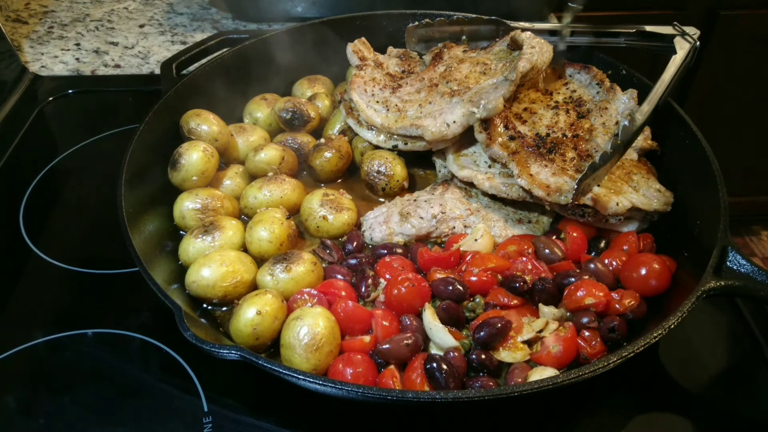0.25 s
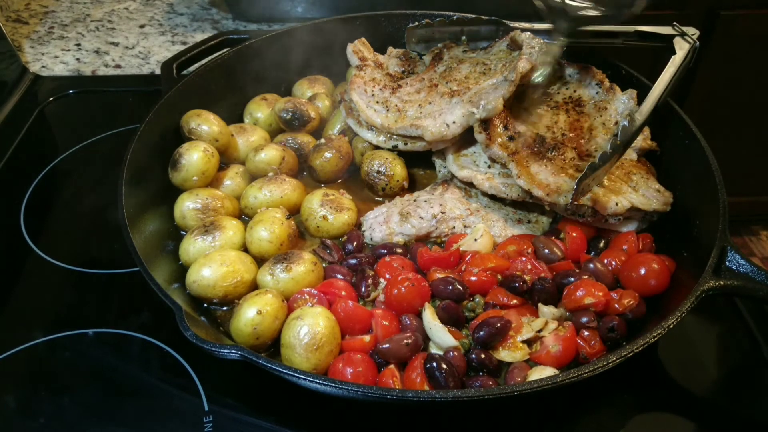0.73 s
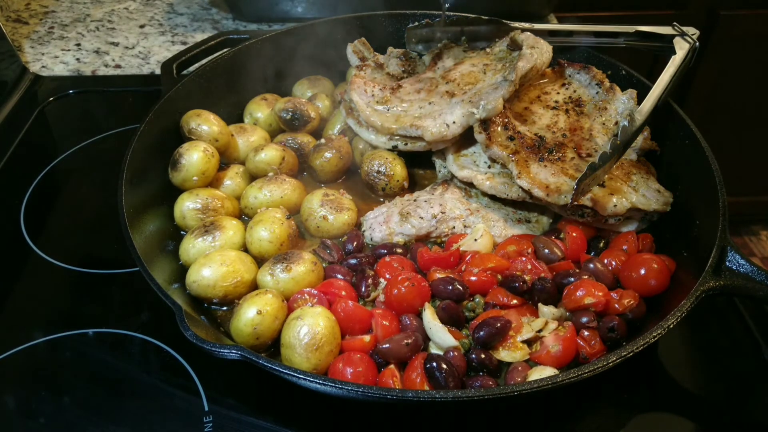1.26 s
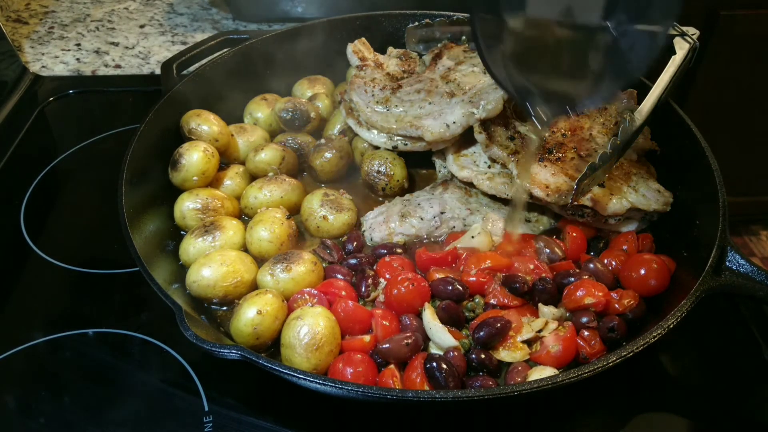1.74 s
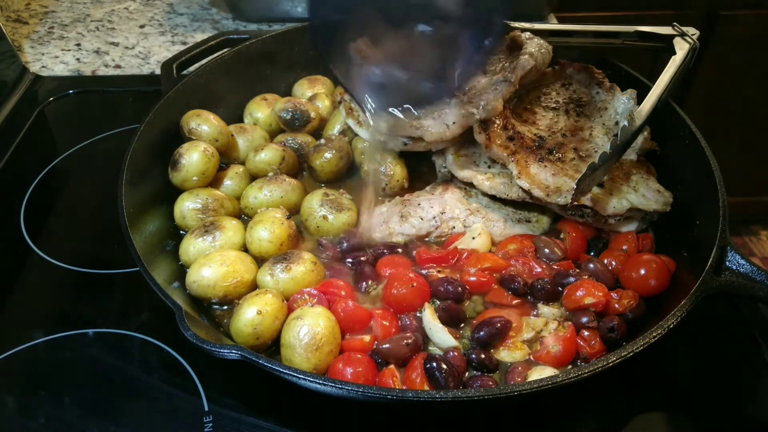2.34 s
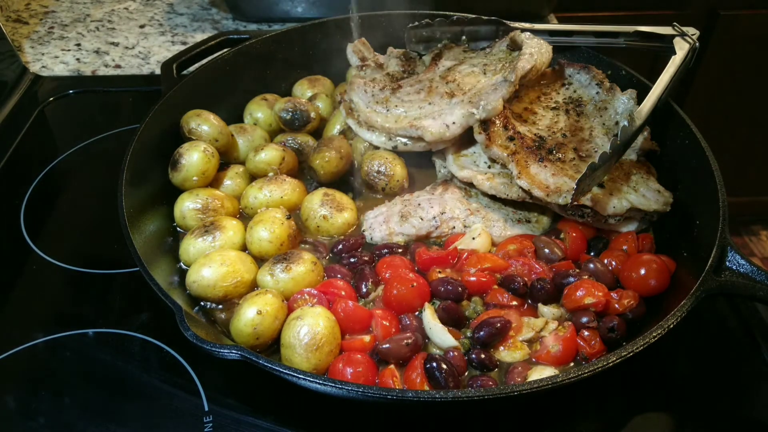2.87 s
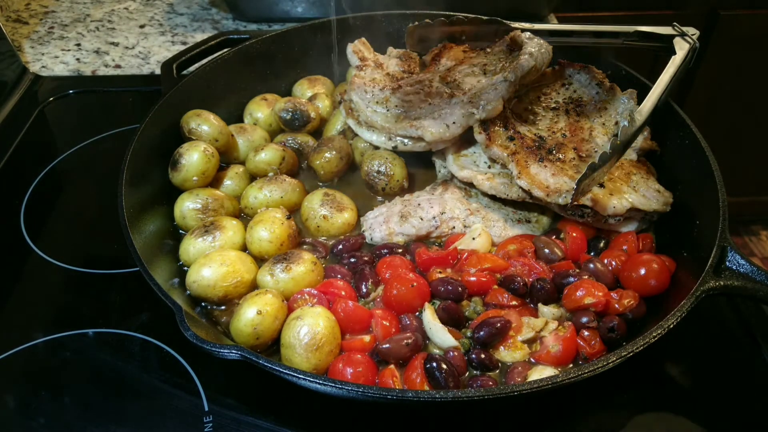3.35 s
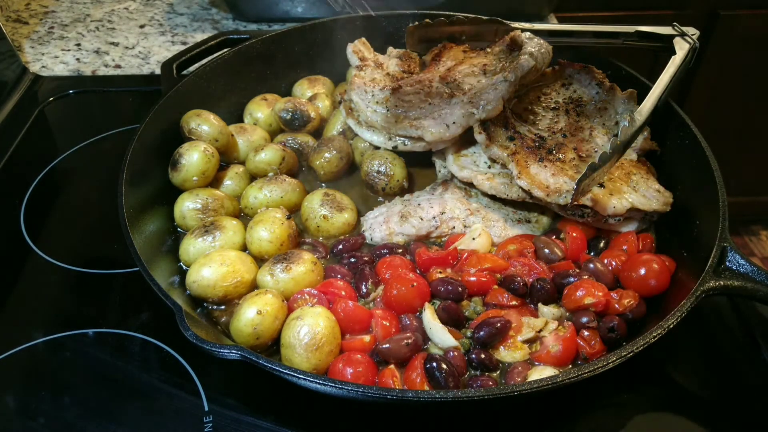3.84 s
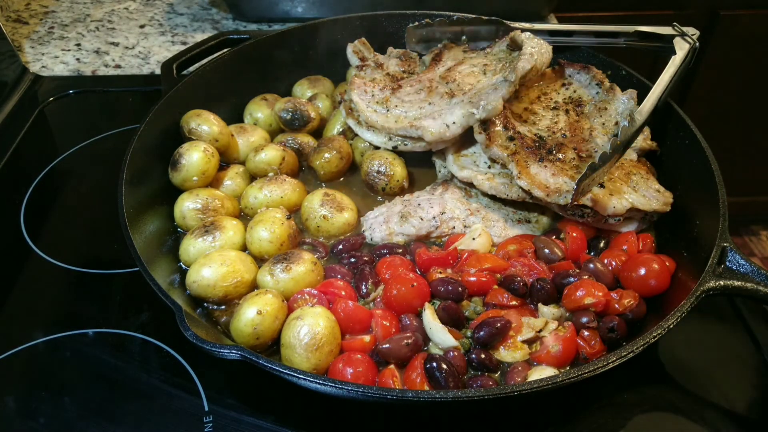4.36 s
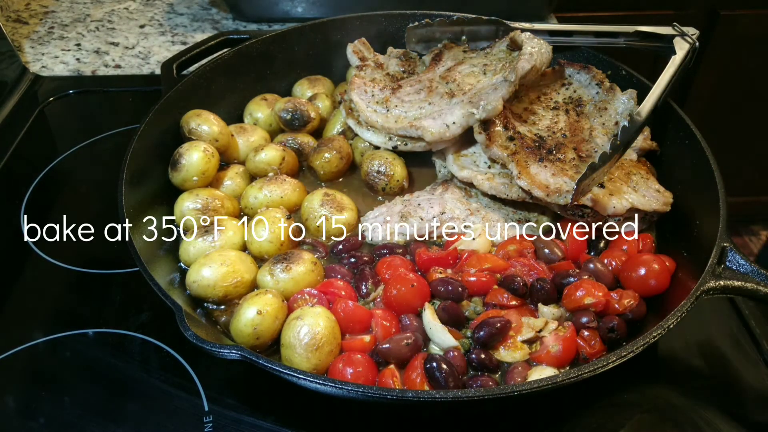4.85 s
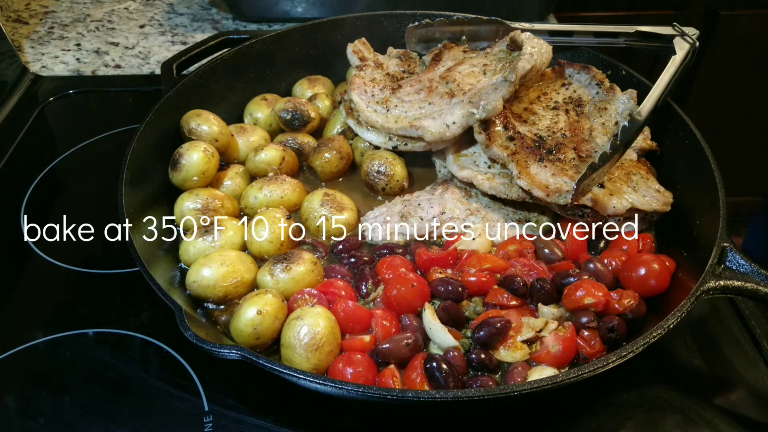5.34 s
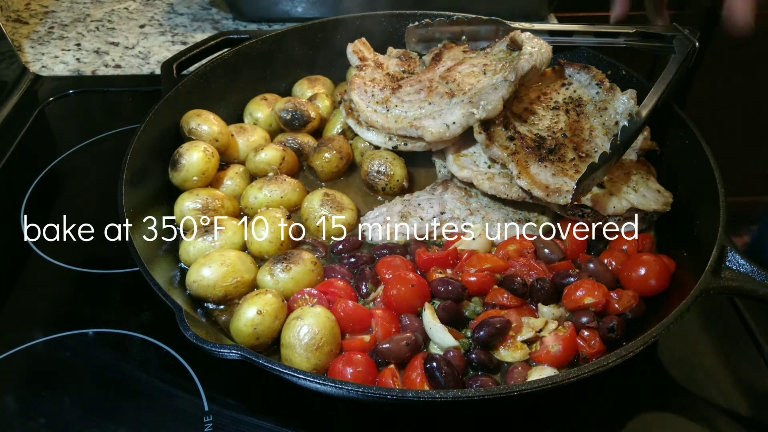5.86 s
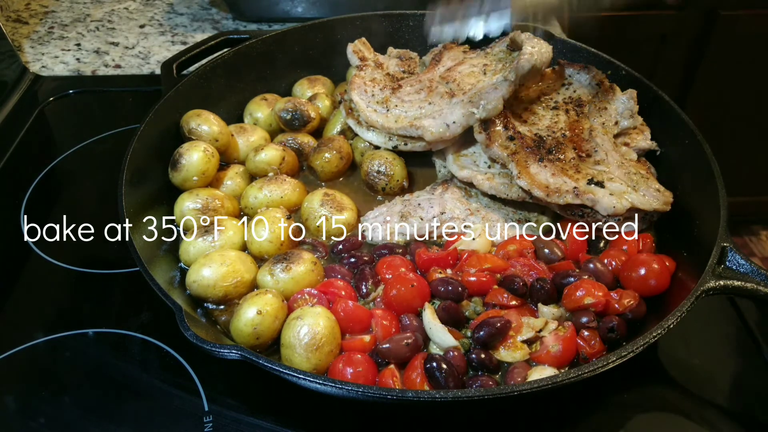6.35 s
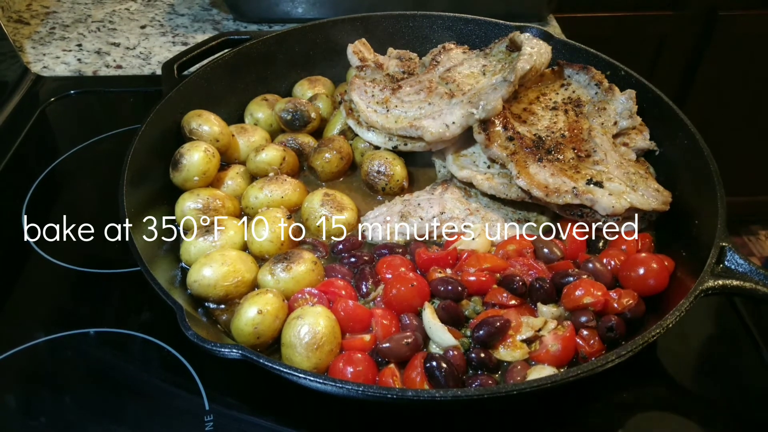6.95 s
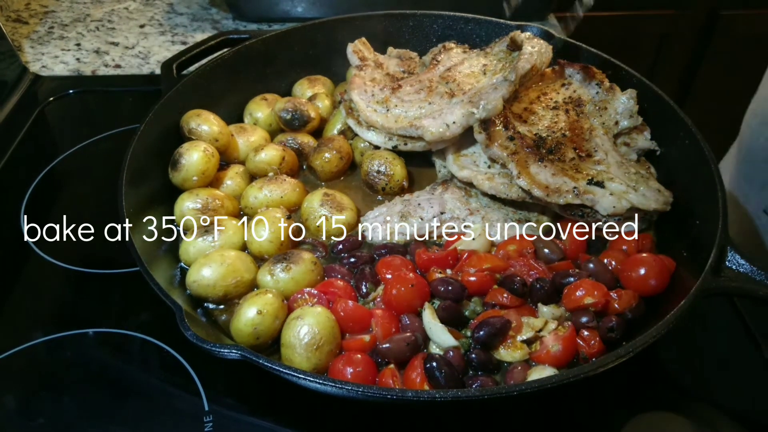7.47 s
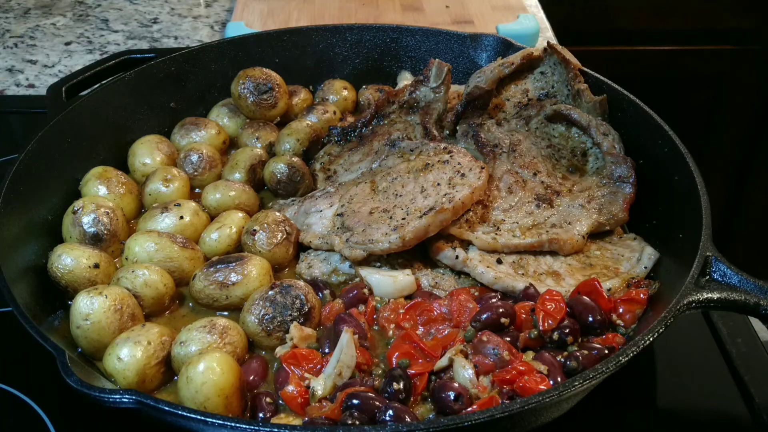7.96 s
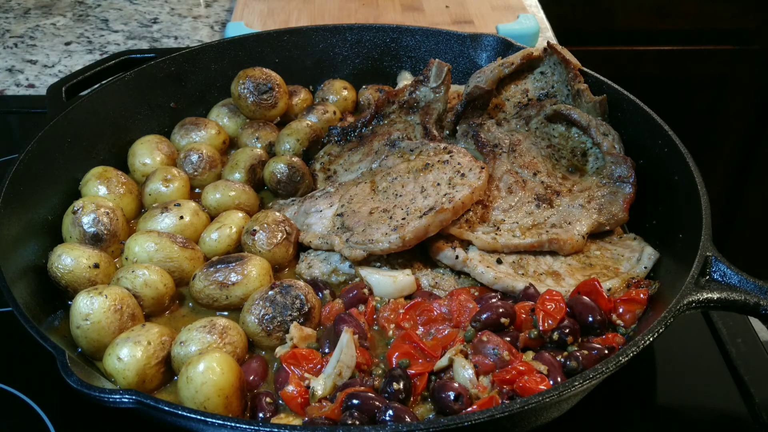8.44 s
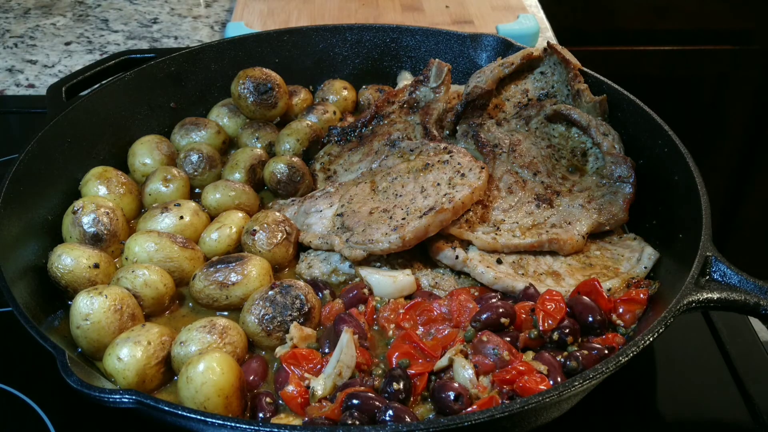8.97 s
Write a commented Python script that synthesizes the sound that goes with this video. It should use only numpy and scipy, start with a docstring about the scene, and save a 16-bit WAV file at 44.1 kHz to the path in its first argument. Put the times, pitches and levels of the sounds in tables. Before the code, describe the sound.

A quiet indoor kitchen heard close to the stove in stereo, with a low wavering motor hum and soft air. From 0 s a skillet simmers and fizzes faintly, with hollow steam leaking until about 1.3 s. Small spits and drips lean to the right. Broth lands briefly near 0.9 and 1.7 s, then in thicker splashes from 2.2 to 3.0 s, with spray, gurgles, plops and one sharp spit at 2.8 s. Afterward the pan settles to a weak simmer with sparse drips. At 5.1 s a metal utensil drops, a very loud hard clank with several bounces and rattle within a tenth of a second, echoing shortly. Light bright tong clicks follow from 5.9 to 7.4 s, with a brief rim scrape near 6.2 s. At 7.7 s everything stops abruptly; from 7.9 s a stiller, bassy room fades in, with a faint rustle around 8.3 to 8.7 s.

```python
"""A motor hums in quiet kitchen air; a skillet simmers and fizzes (noise, bubbles, crackle) and hollow steam leaks.
Spits (band-limited puffs) and drips (rising sines) sound, then broth lands in bursts of spray and gurgle.
From 5.1 s a dropped utensil bounces (decaying modes, noise rattle); tongs click and drag on the rim (resonators).
At 7.7 s the sound stops; a stiller kitchen (shaped noise) fades in, with a faint rustle."""
import sys
import numpy as np
from scipy import signal
from scipy.fft import rfft, irfft
from scipy.io import wavfile

SR = 44100
rng = np.random.default_rng(int(sys.argv[2]) if len(sys.argv) > 2 else 0)


def to_wav(s):
    """Save 16-bit WAV."""
    ch = np.atleast_2d(s).T  # columns
    pcm = np.round(np.clip(ch, -1, 1) * 32767)  # PCM
    wavfile.write(sys.argv[1], SR, pcm.astype(np.int16))


N = 406161
T = np.arange(N) / SR


def amp(db):
    """dB to amplitude factor."""
    return 10 ** (np.asarray(db) / 20)


def rms_one(x):
    """Scale to rms 1."""
    return x / np.sqrt(np.mean(x ** 2) + 1e-20)


def in_time(rows):
    """Interpolate each column of a table over time."""
    s, *columns = np.transpose(rows)
    return [np.interp(T, s, c) for c in columns]


def at_hz(points, hz):
    """Interpolate a table over log frequency."""
    points = np.array(points)
    return np.interp(np.log(hz), np.log(points[:, 0]), points[:, 1])


def panned(x, lr_db, lag=0):
    """Left-right level split; left delayed by lag samples."""
    return np.array([np.roll(x, lag) * amp(lr_db / 2), x * amp(-lr_db / 2)])


def add(out, s, sound):
    """Mix a sound in at s seconds."""
    i = round(s * SR)
    out[:, i:i + sound.shape[1]] += sound


def held(start_s, length_s, db, rise_db_per_s, fall_db_per_s):
    """Gain that rises to its level, holds, and falls away."""
    before_s = np.clip(start_s - T, 0, 1)
    after_s = np.clip(T - start_s - length_s, 0, 1)
    return amp(db - rise_db_per_s * before_s - fall_db_per_s * after_s)


def drift(rate_hz):
    """Slow random wander of spread 1: two-pole low-passed noise, computed every 40 samples."""
    r = np.exp(-80 * np.pi * rate_hz / SR)
    white = rng.standard_normal(N // 40 + 2002)
    slow = signal.lfilter([1], [1, -2 * r, r * r], white)[2000:]
    return np.interp(np.arange(N) / 40, np.arange(len(slow)), rms_one(slow))


def ring(clicks, hz, t60_s):
    """Two-pole resonator: a unit click starts a decaying sine of height 1."""
    r, w = amp(-60 / (t60_s * SR)), 2 * np.pi * hz / SR
    return signal.lfilter([0, np.sin(w)], [1, -2 * r * np.cos(w), r * r], clicks + 1e-18)


def dying_noise(t60_s, click=1.0, size=4096):
    """Decaying noise led by a one-sample click."""
    burst = rng.standard_normal(size) * amp(-60 * np.arange(size) / SR / max(t60_s, .003))
    burst[0] += click
    return burst


# stereo likeness: hz, left_right_likeness (1 = same)
LIKENESS = [(60, 0.93), (150, 0.67), (380, 0.51), (950, 0.1), (2380, 0.1), (5980, 0.1), (15000, 0.05)]
# stereo lean: hz, left_right_db
LEAN = [(60, 0.5), (240, -1.5), (950, -1), (3770, -2.5), (15000, -6)]


def coloured(white, spectrum, patchy_db):
    """Half-octave bands of mid and side noise, each with its level, flicker, likeness and lean; rms 1."""
    out, together = 0, drift(3.0)
    edges = 25 * 2 ** np.arange(0, 9.6, .5)
    for k, (low, high) in enumerate(zip(edges, edges[1:])):
        hz = np.sqrt(low * high)
        if at_hz(spectrum, hz) < -70:
            continue
        sos = signal.butter(2, [low, high], "band", fs=SR, output="sos")
        mid, side = signal.sosfilt(sos, white[k % 2])
        alike = np.clip(at_hz(LIKENESS, hz), -1, 1)
        lean_db = at_hz(LEAN, hz)
        gain = amp(at_hz(spectrum, hz) + patchy_db * (0.4 * together + drift(10)))
        stereo = np.sqrt(1 + alike) * mid + np.sqrt(1 - alike) * side * [[1], [-1]]
        out = out + gain * stereo * amp([[lean_db / 2], [-lean_db / 2]])
    return rms_one(out)


# kitchen air spectrum: hz, relative_db_per_hz
AIR = [(15, -39), (25, -1.5), (102, -0.5), (165, -7), (211, -3), (414, -8), (527, -7.5), (587, -3),
       (654, -10), (1010, -13.5), (1820, -18.5), (3220, -20), (6310, -33), (10800, -26.5), (15800, -27.5)]


def kitchen_air():
    """Steady room noise, shaped by band, flickering slightly."""
    return amp(-66) * coloured(rng.standard_normal((2, 2, N)), AIR, patchy_db=0.9)


# motor tones: pitch_hz, mean_level_db (rms)
HUM = [(118.4, -74), (120.5, -76), (236, -80), (592.2, -77.5), (1723, -89.5)]


def hum():
    """Motor tones that waver a little; the two lowest beat at about 2 Hz."""
    out = 0
    for hz, db in HUM:
        gain = np.sqrt(2) * amp(db + 0.85 * drift(3))
        out = out + gain * np.sin(2 * np.pi * hz * (T - .09))
    return out


def steam():
    """Leaking steam: noise through a 1900 Hz resonance gives a hollow note."""
    hollow = rms_one(ring(rng.standard_normal((2, N)), 1900, 0.012))
    return held(0, 1.3, -71.5, rise_db_per_s=0, fall_db_per_s=140) * hollow


def bubbles(per_s, low_hz, high_hz, cycles):
    """Clumped random bubbles, each ringing for some cycles (to -60 dB) at one of 14 pitches; rms 1."""
    born = rng.random(N) < per_s * amp(4.0 * drift(20)) / SR
    sizes = amp(5.0 * np.minimum(rng.exponential(1, N), 4)) * born
    dealt = rng.integers(0, 14, N)
    pitches_hz = np.geomspace(low_hz, high_hz, 14)
    return rms_one(sum(ring(sizes * (dealt == k), hz, cycles / hz) for k, hz in enumerate(pitches_hz)))


# skillet levels over time: time_s, simmer_db, fizz_db
SKILLET = [(0, -66, -66.5), (.15, -68.5, -70.5), (.9, -69, -76), (1.3, -69.5, -75), (2, -69, -68.5),
           (2.7, -68.5, -70), (3.1, -75.5, -75), (3.5, -73.5, -78.5), (4.2, -73.5, -81), (5.05, -74, -76.5),
           (5.7, -75, -82), (6.5, -70.5, -73.5), (7.2, -73.5, -74.5), (7.7, -69.5, -74)]
# simmer spectrum: hz, relative_db_per_hz
SIMMER = [(150, -80), (290, -40), (500, -4), (584, 0), (642, -7), (993, -3.5), (1890, -4.5), (3020, -18.5),
          (6000, -18.5), (7800, -56), (13200, -120)]


def simmer():
    """Mid-frequency noise plus small resonant bubbles, both following the simmer level."""
    simmer_db, _ = in_time(SKILLET)
    noise = coloured(rng.standard_normal((2, 2, N)), SIMMER, patchy_db=0.94)
    small = bubbles(per_s=170, low_hz=980, high_hz=12000, cycles=7.5)
    return amp(simmer_db) * noise + panned(amp(simmer_db - 6.5) * small, -3.5, lag=3)


def crackle(per_s, spread_db, clump_db, smooth):
    """Random clicks of uneven size in clumps, over some smooth noise."""
    shape = (2, 2, N)
    sizes = amp(spread_db * np.minimum(rng.exponential(1, shape), 5)) * rng.choice([-1, 1], shape)
    born = rng.random(N) < per_s * amp(clump_db * drift(20)) / SR
    return rms_one(sizes * born) + smooth * rng.standard_normal(shape)


# broth landing: start_s, length_s, spray_db, gurgle_db
SPLASHES = [(0.885, .11, -70, -75), (1.647, 0.025, -58.5, -68), (1.701, 0.011, -58.5, -68),
            (2.203, 0.037, -67.5, -80), (2.37, 0.015, -68, -71), (2.472, 0.033, -64, -80),
            (2.555, 0.041, -64.5, -85), (2.696, 0.077, -61, -64.5), (2.811, 0.026, -63, -67.5),
            (2.93, 0.082, -60, -62.5)]


def splash_gain(column):
    """Summed gain of all broth landings; column 2 = spray, 3 = gurgle."""
    return sum(held(row[0], row[1], row[column], rise_db_per_s=903.5, fall_db_per_s=603.5) for row in SPLASHES)


# fizz and spray spectrum: hz, relative_db_per_hz
SPATTER = [(700, -79), (1470, -38), (2500, -0.5), (2640, -10), (2850, -3), (3180, -3), (5890, -6),
           (7590, -7.5), (10900, -4), (15100, -14.5), (15800, -7)]


def fizz_and_spray():
    """Treble crackle: a continuous fizz, stronger where landing broth sprays."""
    _, fizz_db = in_time(SKILLET)
    clicks = crackle(per_s=420, spread_db=3.0, clump_db=8.5, smooth=1.0)
    return (amp(fizz_db) + splash_gain(2)) * coloured(clicks, SPATTER, patchy_db=2.0)


def faint_spits():
    """Faint spits at random moments and pitches, with peaks tied to the fizz level."""
    start_s, end_s, count = 0.046, 4.6, 45
    low_hz, high_hz = 8400, 14500
    when, pitch, size = rng.random((count, 3)).T
    s = start_s + (end_s - start_s) * when
    fizz_db = np.interp(s, *np.transpose(SKILLET)[[0, 2]])
    peak_db = fizz_db + 11 + 6.4 * size
    return list(zip(s, peak_db, low_hz + (high_hz - low_hz) * pitch ** 2))


# clearest spits: start_s, peak_db (before panning), pitch_hz
SPITS = [(0.1073, -53.5, 9880), (0.4424, -51, 15400), (0.8759, -49.5, 10900), (0.9023, -45, 10100),
         (1.0745, -55, 14500), (1.2082, -48, 13600), (1.2296, -53, 11500), (1.52, -52.5, 14200),
         (1.5756, -45.5, 11300), (1.6576, -44.5, 9700), (1.6995, -46, 10500), (1.7374, -47, 11900),
         (1.8592, -49, 12800), (2.085, -54.5, 9350), (2.0961, -51, 10000), (2.2253, -47, 13700),
         (2.2458, -42, 11100), (2.3002, -47, 12000), (2.3655, -52.5, 9740), (2.387, -41, 10550),
         (2.461, -45.5, 10700), (2.47, -46, 10800), (2.4917, -46, 12500), (2.585, -51.5, 10600),
         (2.6858, -44, 12300), (2.7107, -46, 11100), (2.7776, -42, 13100), (2.7899, -35.5, 13700),
         (2.797, -23, 9880), (2.8114, -39, 9900), (2.829, -44, 9800), (2.892, -43, 11500),
         (2.9235, -40, 11200), (2.9537, -39, 14800), (2.9786, -39, 10800), (3.1423, -54, 10800),
         (3.3937, -46, 13600), (3.4705, -52, 10800), (4.239, -56, 10100), (4.4667, -57, 11100)]


def spits():
    """Each spit is a decaying noise puff in a band around its pitch, plus some broad hiss."""
    attack_s, lean_db, scatter_db = 0.0016, -15.5, 3.5   # lean: right of the two channels is louder
    out, t = np.zeros((2, N)), T[:4096]
    for s, db, hz in list(SPITS) + faint_spits():
        band = signal.butter(2, [hz / 1.037, min(hz * 1.12, .45 * SR)], "band", fs=SR, output="sos")
        burst = dying_noise(0.073, click=0)
        burst = burst + 3.5 * rng.standard_normal(len(t)) * (t < attack_s)
        puff = signal.sosfilt(band, burst) + 0.057 * np.diff(burst, 2, prepend=[0, 0])
        add(out, s, panned(amp(db) * puff / np.abs(puff).max(), rng.normal(lean_db, scatter_db)))
    return out


# drips: start_s, relative_level_db, start_pitch_hz
DRIPS = [(0.254, -54.5, 870), (1.6352, -51, 4230), (1.702, -54, 3600), (2.4942, -49, 4720),
         (2.6885, -47, 4440), (2.6979, -46, 2500), (2.7415, -41.5, 3330), (2.766, -48, 4360),
         (2.8316, -45.5, 3400), (2.8923, -42.5, 2420), (2.952, -48, 1840), (2.9814, -41, 5500),
         (2.9853, -45, 1650), (3.476, -54.5, 1120), (4.238, -54, 4730), (4.4278, -57.5, 900),
         (7.3103, -55.5, 1180)]


def drips():
    """Each drip is a decaying sine of rising pitch plus a short resonant splat above it."""
    out, t = np.zeros((2, N)), T[:4096]
    for s, db, hz in DRIPS:
        plop = np.sin(2 * np.pi * hz * t * (1 + 2.8 * t)) * amp(-60 * t * hz / 59.0)
        splat = ring(dying_noise(0.03), hz * 1.4, 2.9 / hz)
        add(out, s, panned(amp(db - 3.5) * (plop + 0.33 * splat), -7.0))
    return out


# room decay: hz, t60_s
ROOM_T60 = [(100, 0.74), (400, 0.76), (800, 0.54), (2400, .68), (5000, .62), (11000, 0.36)]


def kitchen_echoes(x):
    """Diffuse echoes: noise decaying band by band, own in each channel, fading in over 11 ms."""
    bass_alike_hz = 500   # below this both channels hear nearly the same echoes
    t, tail = T[:SR], 0
    edges = 60 * 2 ** np.arange(0, 8.6, .5)
    for low, high in zip(edges, np.minimum(edges[1:], .45 * SR)):
        sos = signal.butter(2, [low, high], "band", fs=SR, output="sos")
        band = signal.sosfilt(sos, rng.standard_normal((2, SR)))
        if high < bass_alike_hz:
            band = band[0] + 0.14 * band
        tail = tail + band * amp(-60 * t / at_hz(ROOM_T60, np.sqrt(low * high)))
    tail = tail * np.clip(t / 0.011, 0, 1)
    tail = tail / np.sqrt(np.sum(tail ** 2) / 2)
    return signal.fftconvolve(x.mean(axis=0, keepdims=True), tail, axes=1)[:, :N]


def gurgle():
    """Longer-ringing bubbles under each broth landing."""
    ringing = bubbles(per_s=450, low_hz=1630, high_hz=6500, cycles=27.0)
    return panned(splash_gain(3) * ringing, -3.5, lag=3)


# utensil bounces: start_s, level_db, brightness_db_per_octave
BOUNCES = [(5.104, -13.5, 2.1), (5.154, -13.5, 1.35), (5.179, -12, -2), (5.198, -19.5, -1.5),
           (5.204, -20, 1), (5.211, -22, 1), (5.218, -21.5, -1.7)]
# utensil modes: pitch_hz, relative_db, t60_s
UTENSIL = [(435, -22.5, 0.033), (647, -11, 0.014), (780.3, -1, 0.074), (867, -13.5, 0.044),
           (1020, -15, 0.021), (1182, -16.5, 0.047), (1257, -17.5, 0.062), (1400, -23, 0.023),
           (2264, -15.5, 0.074), (2422, -18, 0.072), (2636, -16, .12), (3190, -23, 0.016),
           (3730, -18.5, 0.074), (4330, -21.5, 0.16), (4500, -15, .05), (5530, -20.5, 0.089),
           (6050, -17, .07), (8960, -20, 0.031), (10260, -20, 0.024), (11400, -19.5, 0.015),
           (13400, -21, 0.014)]
# rattle of the counter and loose parts: hz, relative_db_per_hz
CLATTER = [(60, -35.5), (200, -30.5), (340, -39.5), (550, -24), (780, -13), (985, -22), (1270, -19),
           (2030, -34), (2330, -20), (3090, -34), (4380, -29), (5160, -34.5), (8000, -36), (11400, -31),
           (15800, -38)]


def utensil():
    """Every bounce strikes all modes, randomly detuned, and shakes out a short broad rattle."""
    attack_s, rattle_attack_s, rattle_t60_s = 0.0018, 0.0041, 0.13
    out, t = np.zeros((2, N)), T[:8192]
    colour = amp(at_hz(CLATTER, np.maximum(np.fft.rfftfreq(len(t), 1 / SR), 1)))
    hz, mode_db, t60_s = np.transpose(UTENSIL)[:, :, None]
    signs = (-1) ** np.arange(len(hz))[:, None]
    for s, db, tilt in BOUNCES:
        spread_db, detune = rng.standard_normal((2, len(hz), 1)) * [[[2.1]], [[.006]]]
        strengths = amp(db + mode_db + tilt * np.log2(hz / 800) + spread_db - 60 * t / t60_s)
        modes = np.sum(strengths * np.sin(2 * np.pi * hz * (1 + detune) * t) * signs, axis=0)
        modes = modes * np.clip(t / attack_s, 0, 1)
        modes[110:] += amp(-12.5) * modes[:-110].copy()   # echo off the splashback, 2.5 ms late
        shake = rng.standard_normal((3, len(t)))
        rattle = rms_one(irfft(rfft(shake[0] + 0.59 * shake[1:]) * colour))
        rattle = amp(db - 11.0) * rattle * np.clip(t / rattle_attack_s, 0, 1) * amp(-60 * t / rattle_t60_s)
        add(out, s, panned(modes, -3.5, lag=4) + rattle * amp([[-1.5], [1.5]]))
    return out


# tongs clicking: start_s, peak_db (before panning), left_right_db
CLICKS = [(5.895, -51.5, -2), (6.2317, -38.5, -4), (6.2576, -37.5, -11.5), (6.545, -38, -8.5),
          (6.6321, -32, -11), (6.6467, -33, 2), (7.0049, -41, -5), (7.05, -46.5, -5), (7.242, -38.5, -12),
          (7.2594, -45, -2), (7.411, -47, -1)]
# tong modes: pitch_hz, width_hz, relative_db
TONGS = [(2770, 900, -39), (4480, 730, -26), (6400, 1300, 0), (8850, 1200, -20), (10800, 950, 16),
         (12300, 1600, 23), (14500, 1700, 10)]


def tong_clicks():
    """A decaying noise burst rattles the steel arms' broad modes, with a bright direct part."""
    out = np.zeros((2, N))
    for s, db, lr_db in CLICKS:
        burst = dying_noise(0.053, click=5.3)
        click = 0
        for (hz, width_hz, mode_db), extra_db in zip(TONGS, rng.normal(0, 4.9, len(TONGS))):
            t60_s = np.log(1000) / (np.pi * width_hz)
            click = click + amp(mode_db + extra_db) * ring(burst, hz, t60_s)
        click = rms_one(click) + 0.41 * rms_one(np.diff(burst, prepend=0))
        add(out, s, panned(amp(db) * click / np.abs(click).max(), lr_db, lag=6))
    return out


# tongs dragged over the rim: start_s, length_s, level_db
DRAG = [(6.168, 0.027, -54), (6.275, .008, -66)]
# skillet modes: pitch_hz, relative_db, t60_s
PAN = [(349, 0, 0.48), (471, -3.5, 0.075), (1160, -17, 0.037), (1320, -6.5, 0.056), (1880, -17, .01),
       (2680, -10, .01), (4100, -9.5, .002), (11500, -6.5, 0.00031)]


def tong_drag():
    """Dense random slips (5000 per s) excite the skillet's modes."""
    slips = rng.standard_normal(N) * (rng.random(N) < 5000 / SR)
    scrape = sum(amp(db) * rms_one(ring(slips, hz, t60_s)) for hz, db, t60_s in PAN)
    gain = sum(held(*row, rise_db_per_s=700, fall_db_per_s=350) for row in DRAG)
    return panned(gain * rms_one(scrape), -5.0)


# stiller kitchen air spectrum: hz, relative_db_per_hz
LATER = [(15, -46), (25, -10), (43, -5), (68, 0.5), (102, -6.5), (130, -14.5), (299, -7.5), (361, -20),
         (527, -13), (572, -17.5), (749, -19), (1870, -30), (15800, -55.5)]


def later_air():
    """Air after the pause: shaped noise, mostly bass."""
    return amp(-64) * coloured(rng.standard_normal((2, 2, N)), LATER, patchy_db=1.5)


def rustle():
    """A faint rustle swelling out of steady hiss: slightly brightened noise that flickers."""
    hiss = signal.lfilter([1, -.3], [1], rng.standard_normal((2, N)))
    swell = held(8.32, 0.37, -78, rise_db_per_s=82, fall_db_per_s=86)
    return (swell + amp(-82)) * amp(2.0 * drift(13)) * hiss


def scene():
    """Cooking and its echoes until the stop, then the stiller kitchen."""
    stop_s, fade_start_s, fade_end_s = 7.704, 7.876, 8.144
    background = kitchen_air() + hum()
    skillet = steam() + simmer() + fizz_and_spray() + gurgle()
    near = spits() + drips() + tong_clicks() + tong_drag()
    dropped = utensil()
    echoes = kitchen_echoes(amp(-13.0) * near + amp(-3.0) * dropped)
    first = background + skillet + near + dropped + echoes
    later = later_air() + rustle()
    fade_in = np.clip((T - fade_start_s) / (fade_end_s - fade_start_s), 0, 1)
    return first * (T < stop_s) + later * fade_in ** 1.16


def record(dry):
    """The microphone drops the bass below 42 Hz; the top is cut steeply at 16 kHz."""
    thin = signal.sosfilt(signal.butter(4, 42, "high", fs=SR, output="sos"), dry)
    return signal.sosfilt(signal.ellip(12, .3, 60, 16000, fs=SR, output="sos"), thin)


dry = scene()
out = record(dry)
to_wav(out)
```